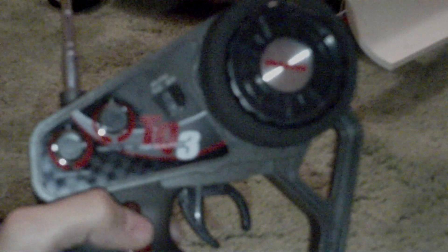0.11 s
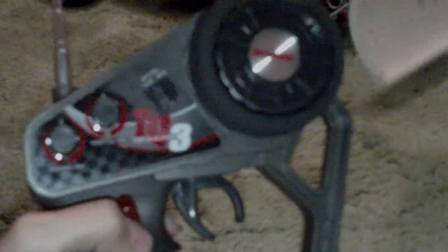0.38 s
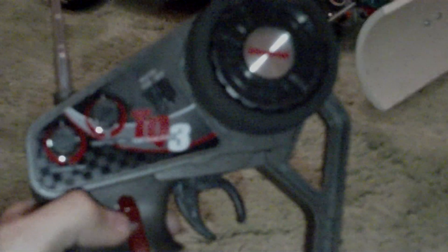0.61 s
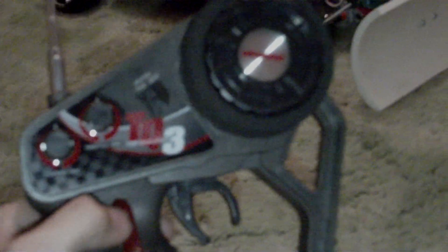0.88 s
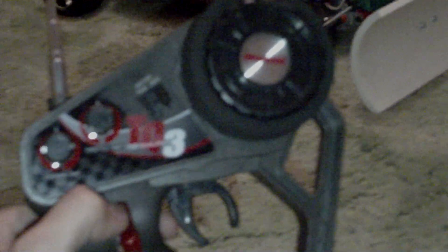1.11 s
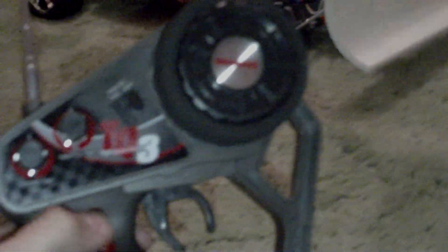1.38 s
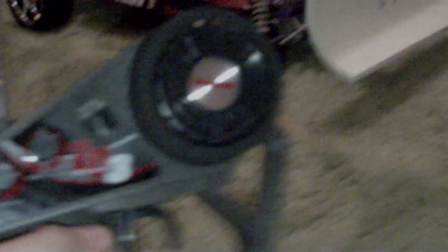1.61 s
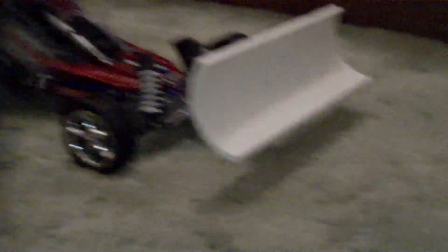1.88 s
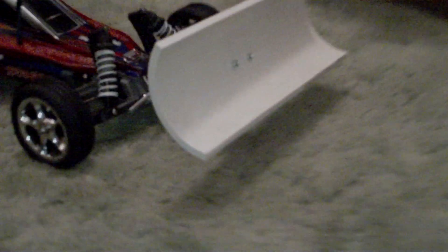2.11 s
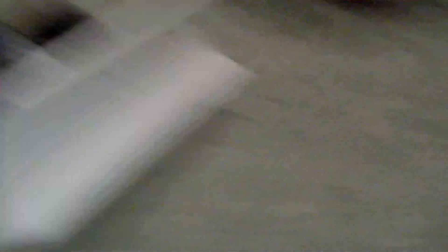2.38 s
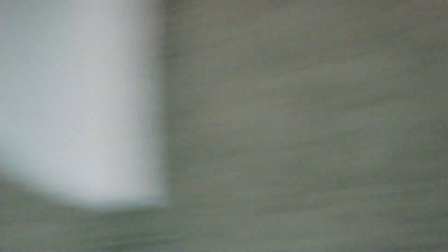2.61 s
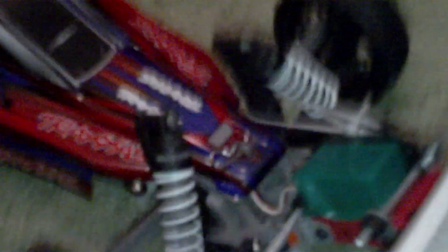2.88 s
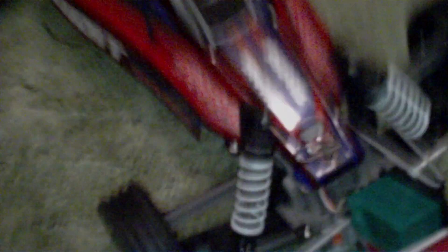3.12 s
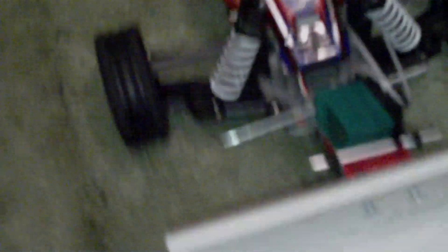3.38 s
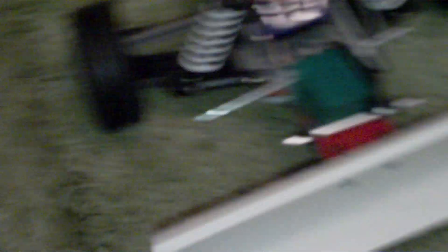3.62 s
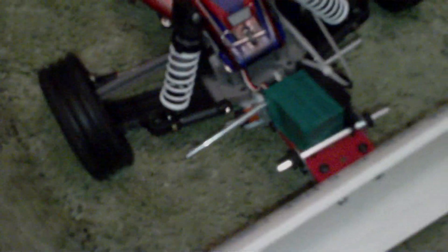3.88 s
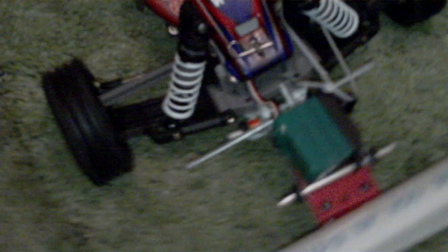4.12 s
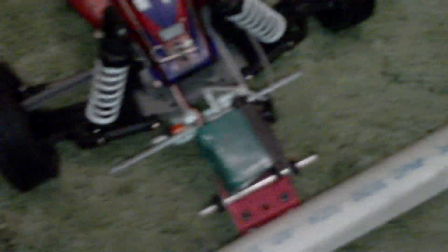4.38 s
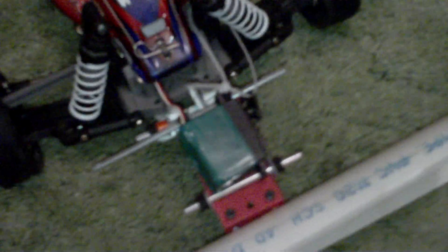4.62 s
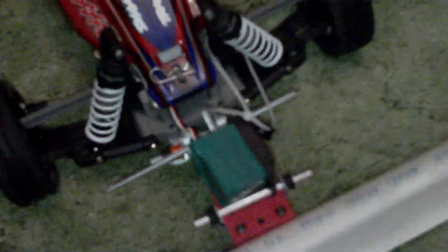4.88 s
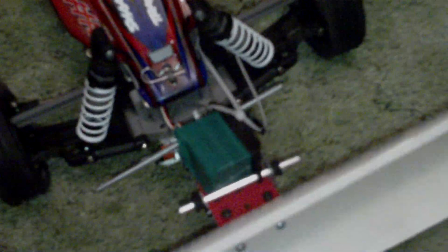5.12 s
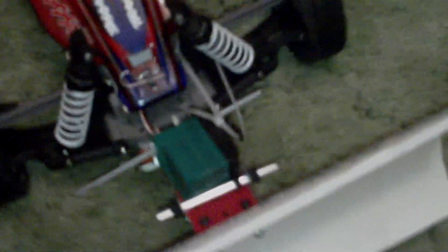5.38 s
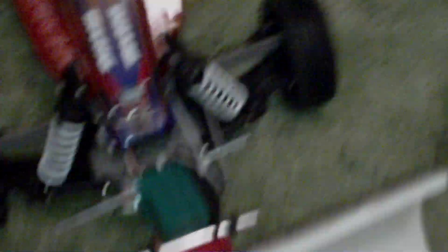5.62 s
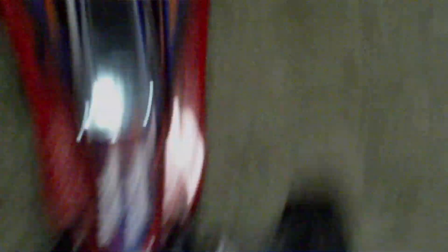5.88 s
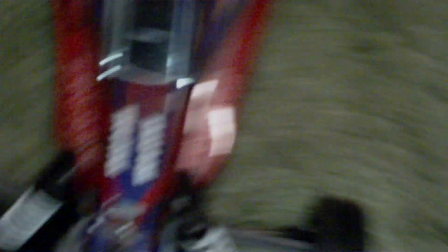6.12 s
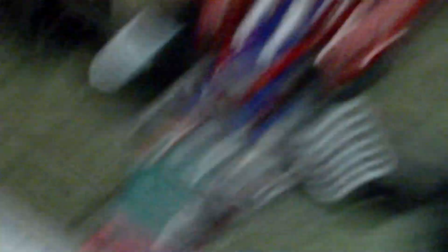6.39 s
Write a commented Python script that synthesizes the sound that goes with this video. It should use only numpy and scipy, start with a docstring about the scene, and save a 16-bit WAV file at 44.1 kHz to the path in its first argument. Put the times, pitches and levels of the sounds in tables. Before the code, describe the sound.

A small toy servo whirs down and up between crisp clicks, interrupted by loud handling thumps, then repeats closer and louder.

```python
"""A quiet carpeted room: soft noise, a wavering hum, a rustle of cloth and the rumble of a hand on the microphone.
A hand flips a radio handset's switch; a servo whirs (gear teeth whining over hiss) and lowers a toy plow, then lifts it.
From about 2 s the microphone is swung about: case modes ring to knocks, noise bands rustle, the grip rumbles.
From 3.9 s, closer, the plow goes down, up and down again, with more knocks and short puffs as gear play is taken up.
One microphone feeds both channels, the left one sample late."""
import sys
import numpy as np
from scipy import signal
from scipy.fft import rfft, irfft, next_fast_len
from scipy.io import wavfile
from scipy.ndimage import uniform_filter1d

SR = 44100
rng = np.random.default_rng(int(sys.argv[2]) if len(sys.argv) > 2 else 0)


def dump(signal):
    """Clip the signal to [-1, 1] and save it as 16-bit WAV at the path in sys.argv[1]."""
    limited = np.clip(np.atleast_2d(signal).T, -1, 1)
    pcm = np.round(limited * 32767).astype(np.int16)
    wavfile.write(sys.argv[1], SR, pcm)


def rack_gain(trim_db):
    """Turn a fader trim in dB into the linear factor to multiply a signal by."""
    fader = np.asarray(trim_db, float)
    return 10 ** (fader / 20)


N = 287091  # length in samples

# room noise: f/Hz, relative level per Hz/dB
ROOM_SPECTRUM = [(24, -23), (40, -1), (114, -9), (154, -18.5), (235, -19.5), (417, -23), (621, -32.5),
                 (926, -23.5), (998, -42), (2220, -32.5), (10900, -47), (12100, -29.5), (15500, -67.5)]
ROOM_TONE_DB = -66
HUM_HZ, HUM_DB = 121.6, -76
# faint brief tones: start t/s, length t/s, first f/Hz, last f/Hz, level/dB
BRIEF_TONES = [(0.022, 0.28, 233, 239.3, -68.5), (1.04, 0.42, 280, 278.4, -72.5),
               (4.414, 0.38, 2400, 2205, -81)]
# course of cloth and carpet rubbing, shifted in level by each sound that follows it: t/s, level/dB
RUBBING = [(0.0, -81.5), (0.22, -81.5), (0.4, -71), (0.82, -79.5), (1.49, -74), (1.81, -62.5),
           (2.19, -68.5), (2.65, -71.5), (2.9, -64), (3.3, -67.5), (3.85, -68), (4.24, -74), (4.8, -80),
           (5.24, -80), (5.4, -68), (5.53, -74), (5.9, -67.5), (6.13, -73.5), (6.51, -69.5)]
# noise of rubbed cloth before its tilt: f/Hz, relative level per Hz/dB
CLOTH_SPECTRUM = [(88, -35), (150, -11), (366, -5), (736, -4), (894, -3), (3830, -7.5), (7860, -10),
                  (10500, -8.5), (14100, -7.5), (15500, -41)]
CLOTH_TILT_DB = -3  # per octave
# rumble of the hand: f/Hz, relative level per Hz/dB
GRIP_SPECTRUM = [(11, -32), (18, -3), (28, -4), (65, -28), (118, -30.5), (200, -38.5), (260, -55.5),
                 (440, -120)]
# grip on the case: t/s, sway level/dB, tremor level/dB
GRIP_COURSE = [(0.0, -70.5, -73.5), (1.3, -77.5, -68.5), (1.92, -73, -60), (2.23, -56, -68),
               (2.5, -52, -42), (2.63, -62, -63), (2.72, -55.5, -53.5), (3.48, -69, -49.5),
               (3.55, -49, -55), (3.62, -51, -46), (4.22, -65.5, -48.5), (4.68, -75.5, -69),
               (5.51, -70, -56), (6.15, -71, -64.5), (6.29, -50, -38.5), (6.51, -61, -56)]
TREMOR_HZ = 7.4  # on average
# the palm bumps the case: t/s, level/dB
PALM_BUMPS = [(1.0, -65), (2.3, -51), (2.487, -33), (2.63, -51), (3.14, -51), (3.6, -71), (3.92, -58),
              (5.88, -63), (6.33, -50), (6.35, -42.5)]
THUD_SPREAD_S, THUD_BED_DB = 0.0072, -74.5
# fingers slip on the case: t/s, level/dB
FINGER_SLIPS = [(2.21, -54.5), (2.37, -58), (2.65, -54.5), (2.7, -57), (2.96, -64), (3.14, -54.5),
                (3.79, -63.5), (4.18, -65.5), (5.57, -70)]
SLIP_SPREAD_S, CREEP_UNDER_RUBBING_DB = 0.03, 12
# modes of the microphone case: f/Hz, level/dB, ring time to -60 dB without the hand t/s
CASE_MODES = [(90, -15, .04), (215, -1, .013), (310, -5, .012), (445, 0, .016), (700, -9, .025),
              (1060, -9, .012), (1290, -6, .011), (1700, 0, .01), (2120, -6, .011), (2570, -7, .011),
              (3015, -10, .014), (4340, -9, .008), (6800, -10, .006)]
# switch blows: t/s, peak level of the ring/dB, centre f/Hz, fall per octave from it/dB, crack over the ring/dB
SWITCH_BLOWS = [(0.186, -50, 1510, 2, 2), (0.206, -15.5, 3920, 2, -1), (0.962, -28, 1150, 10.5, 2),
                (1.642, -41, 890, 14.5, -3), (3.87, -40, 750, 12, -10.5), (3.889, -19.5, 1580, 2, -1),
                (4.622, -38, 752, 14, -19), (5.546, -45.5, 740, 6.5, -17), (5.58, -53, 1500, 8, -4),
                (5.602, -22, 1120, 7.5, -0.5)]
# modes of the handset: f/Hz, level/dB, ring time to -60 dB without the hand t/s
HANDSET_MODES = [(520, -10, .03), (750, -9, .022), (950, -2, .018), (1090, -5, .018), (1250, 0, .018),
                 (1590, -2, .018), (2100, -10, .014), (2640, -4, .014), (3170, -5, .014), (3400, -6, .014),
                 (3820, 2, .014), (4620, -4, .013), (5400, -13, .011), (7230, -6, .011), (9380, -5, .01),
                 (12000, -10, .008)]
HAND_DAMPING = 4500  # dB per s lost to the hand round the handset
# strokes that lower the plow: start t/s, level/dB, treble reaching the microphone (before a 7 dB lift)/dB,
# rise t/s, share of the box's colour 0-1
DOWN_STROKES = [(.3, -57, -6.5, 0.031, 0.4), (3.989, -48.5, -4, .03, 0.9), (5.683, -49, -2.5, 0.035, 0.95)]
# strokes that lift the plow: the same columns
UP_STROKES = [(1.001, -57.5, -8.5, 0.05, .6), (4.648, -49, -3, 0.01, 1)]
# course of a lowering stroke, its speed smoothed later: t after the start/s, rotor turns per s,
# whir level/dB, load on the lower teeth/dB, treble level/dB
LOWERING = [(0, 264, -8, -13, 9.5), (.05, 288, -2, -3, 0.5), (.135, 306, -2.5, -10, 7),
            (.147, 298, -3, -21, -1), (.165, 290, -4, -23, 0.5), (0.219, 291, -2.5, -2, 3)]
# course of a lifting stroke: the same columns
LIFTING = [(0, 193.6, -4.5, -8, -1.5), (0.056, 213.5, -1, -17, 4.5), (0.097, 223.5, -1, -10, 5),
           (0.13, 203.6, 1, -18, -4), (.181, 167.4, -0.5, -16.5, 1.5), (.255, 197.5, -1, -5, -2),
           (0.311, 192, -1.5, -13.5, -2.5), (0.383, 198.2, -4, -6, 1)]
# tooth rates of the ten-tooth pinion, its overtones and the next gear:
# multiple of rotor speed, level/dB, sideband fall per step/dB
TOOTH_RATES = [(10, 12, 14), (18, 10, 9), (20, 12, 10), (30, 0, 6), (40, -5, 6), (45, -5, 5), (50, -6, 6)]
# broad bumps in the response of the servo box: f/Hz, width f/Hz, height against the flat base/dB
BOX_BUMPS = [(3340, 660, 8.5), (4540, 370, 3), (6070, 700, 10), (7050, 580, 4), (8590, 690, 10),
             (11600, 870, -14), (13150, 750, -12)]
RUN_OUT_S, INERTIA_S = 0.011, 0.015
HISS_DB, HISS_DB_PER_TURN = -2, 0.045  # hiss over whine at 200 turns per s, and its growth with speed
OFF_AXIS_HISS_DB = 13  # more hiss with none of the box's colour: the whine blurs when the box faces away
# knocks on the microphone case: t/s, peak level of the ring/dB, centre f/Hz, fall per octave from it/dB,
# crack over the ring/dB
CASE_KNOCKS = [(0.432, -52.5, 1200, 23, -20), (1.059, -53.5, 663, 16, -20), (2.195, -46, 471, 1, -23),
               (2.214, -43, 516, 3.5, -23), (2.284, -41.5, 515, -2, -17), (2.316, -36, 428, 0.5, -3.5),
               (2.487, -7.5, 433, 8, -10), (2.506, -6, 1782, 2, -13.5), (2.541, -30.5, 1110, 15, 5),
               (2.633, -43, 457, 2, -6.5), (2.66, -47, 445, 2, -6), (2.92, -43.5, 517, 7, -2),
               (2.979, -48.5, 456, 15, -10.5), (3.126, -47, 493, 2, -22), (3.138, -41, 478, 5, -10),
               (3.218, -43.5, 380, 3, -20.5), (4.706, -45, 709, 43.5, -20), (5.725, -52, 483, 10, -22.5),
               (5.836, -32, 650, 9.5, 0.5), (5.857, -29.5, 487, 0, -16), (5.932, -48.5, 468, 8, -20),
               (6.34, -39, 514, 10, -33), (6.366, -41.5, 470, 6.5, -15)]
# gear play taken up: t/s, peak level (lowered and coloured by the box later)/dB
GEAR_PLAY = [(3.9734, -44), (3.9978, -45), (4.2328, -50), (5.66, -43), (5.6763, -52), (5.686, -49),
             (5.937, -50)]
# microphone port nulls: f/Hz, width f/Hz
PORT_NULLS = [(7880, 450), (11100, 250)]
MIC_TOP_HZ = 14000


def rms_one(x):
    """Scales to rms 1."""
    return x / np.sqrt(np.mean(x ** 2) + 1e-20)


def in_time(rows):
    """Draws straight lines between the rows: one value per sample for each column."""
    s, *columns = np.transpose(rows)
    return [np.interp(np.arange(N) / SR, s, c) for c in columns]


def drift(rate, size=N):
    """Slow random wandering of spread 1: twice-smoothed noise."""
    r = np.exp(-2 * np.pi * rate / SR)
    wandering = signal.lfilter([1], [1, -2 * r, r * r], rng.standard_normal(size + 9000))
    return rms_one(wandering[9000:])


def held(start, length, rise_s, fall_s):
    """A gain that rises from the start, holds, and falls after the end."""
    return np.interp(np.arange(N) / SR - start, [0, rise_s, length, length + fall_s], [0, 1, 1, 0])


def swells(events, spread_s):
    """A gain that grows towards each event and dies away evenly on both sides."""
    t = np.arange(N) / SR
    return sum(rack_gain(db) * np.exp(-np.abs(t - s) / spread_s) for s, db in events)


def noise(spectrum, patchy_db, tilt_db=0):
    """Half-octave noise bands, each with its own flicker; the tilt turns about 1 kHz."""
    hz_points, db_points = np.transpose(spectrum)
    edges = 11 * 2 ** np.arange(0, 11, 0.5)
    white = rng.standard_normal((2, N + 9000))
    out = 0
    for k, (low, high) in enumerate(zip(edges, edges[1:])):
        hz = np.sqrt(low * high)
        if hz_points[0] < hz < hz_points[-1]:
            band_pass = signal.butter(2, [low, high], "band", fs=SR, output="sos")
            band = signal.sosfilt(band_pass, white[k % 2])[9000:]
            # drawn on every 20th sample, so a rate of 30 Hz
            flicker = np.repeat(drift(20 * 30, size=N // 20 + 1), 20)[:N]
            level_db = np.interp(np.log(hz), np.log(hz_points), db_points)
            out = out + band * rack_gain(level_db + patchy_db * flicker + tilt_db * np.log2(hz / 1000))
    return out


def room_tone():
    """The steady, patchy noise of the quiet room."""
    return rack_gain(ROOM_TONE_DB) * rms_one(noise(ROOM_SPECTRUM, patchy_db=4.0))


def tones():
    """A hum wavering in pitch and level, and a few brief gliding tones, all plain sines."""
    hum_phase = 2 * np.pi * np.cumsum(HUM_HZ + 2.366 * drift(6.8)) / SR
    out = rack_gain(HUM_DB + 4.2 * drift(3.2)) * np.sin(hum_phase)
    for start, length, first_hz, last_hz, db in BRIEF_TONES:
        hz, = in_time([(start, first_hz), (start + length, last_hz)])
        gain = rack_gain(db + 1.5 * drift(5)) * held(start, length, 0.01, 0.03)
        out += gain * np.sin(2 * np.pi * np.cumsum(hz) / SR)
    return np.sqrt(2) * out  # a sine of rms 1


def rustle():
    """Cloth and carpet rubbing: flickering noise that follows the course of the rubbing."""
    rubbing_db, = in_time(RUBBING)
    return rack_gain(rubbing_db + 18) * noise(CLOTH_SPECTRUM, patchy_db=2.0, tilt_db=CLOTH_TILT_DB)


def grip():
    """Slow sway and tremor of the hand, with thuds of noise between 50 and 150 Hz as the palm bumps."""
    sway_db, tremor_db = in_time(GRIP_COURSE)
    thud_band = signal.butter(2, [50, 150], "band", fs=SR, output="sos")
    thuds = rms_one(signal.sosfilt(thud_band, rng.standard_normal(N)))
    bumps = rack_gain(THUD_BED_DB + 0.83 * drift(5.1)) + swells(PALM_BUMPS, THUD_SPREAD_S)
    tremor = np.sqrt(2) * np.sin(2 * np.pi * np.cumsum(TREMOR_HZ + 3.6 * drift(0.67)) / SR)
    sway = rms_one(noise(GRIP_SPECTRUM, patchy_db=2.5))
    return rack_gain(sway_db) * sway + rack_gain(tremor_db) * tremor + bumps * thuds


def ringing(modes, centre_hz, focus_db, lucks_db):
    """Ring of a body hit where the modes near the centre answer best; neighbours swing in opposition."""
    t = np.arange(4000) / SR
    out = 0
    for k, ((hz, db, t60), luck_db) in enumerate(zip(modes, lucks_db)):
        level_db = db + luck_db - focus_db * abs(np.log2(hz / centre_hz))
        out = out + (-1) ** k * rack_gain(level_db - 60 * t / t60) * np.sin(2 * np.pi * hz * t)
    return out


def scuffs(per_s=110.0, soft_hz=900):
    """Uneven soft slips of skin ring the lower modes of the case."""
    sizes = rack_gain(3.8 * np.minimum(rng.exponential(1, N), 4))
    slips = (rng.random(N) < per_s / SR) * sizes * rng.choice([-1, 1], N)
    slips = signal.sosfilt(signal.butter(2, soft_hz, fs=SR, output="sos"), slips + 1e-18)
    rung = signal.fftconvolve(slips, ringing(CASE_MODES, 520, 4.7, np.zeros(len(CASE_MODES))))[:N]
    creep = rack_gain(in_time(RUBBING)[0] - CREEP_UNDER_RUBBING_DB)
    return (creep + swells(FINGER_SLIPS, SLIP_SPREAD_S)) * rms_one(rung)


def struck(events, modes, grip_damping, rattle_db, rattle_s, crack_s, crack_hz, contact_s):
    """Each blow and the rattle swelling behind it ring the modes, damped by the hand (dB per s), under a crack."""
    out, t = np.zeros(N + 5000), np.arange(4000) / SR
    chance = rng.standard_normal((len(events), len(modes)))
    grit = rng.standard_normal((len(events), 2, 4000))
    bright = signal.butter(1, crack_hz, "band", fs=SR, output="sos")
    for (s, peak_db, centre_hz, focus_db, crack_db), lucks, (rattle, crack) in zip(events, chance, grit):
        # the weaker the blow, the looser the rattle and the longer the contact
        rattle_gain = rack_gain(rattle_db - 0.29 * (peak_db + 43.5))
        force = rattle_gain * rattle * t / rattle_s * np.exp(-t / rattle_s) + (t == 0)
        r = np.exp(-rack_gain(0.12 * peak_db) / (contact_s * SR))
        force = signal.lfilter([1], [1, -2 * r, r * r], force)
        ring = ringing(modes, centre_hz, focus_db, 2 * lucks) * rack_gain(-grip_damping * t)
        blow = signal.fftconvolve(force, ring)[:4000]
        blow = blow / np.abs(blow).max()
        blow = blow + rack_gain(crack_db) * signal.sosfilt(bright, crack * np.exp(-t / crack_s))
        at = round((s + 0.001) * SR)  # the force peaks just after first touch
        out[at:at + 4000] += rack_gain(peak_db) * blow
    return out[:N]


def switch_flips():
    """The switch strikes the handset, whose ring the hand quickly stops."""
    return struck(SWITCH_BLOWS, HANDSET_MODES, grip_damping=HAND_DAMPING, rattle_db=-8, rattle_s=0.0022,
                  crack_s=0.0018, crack_hz=[2500, 11000], contact_s=1e-5)


def room(x, t60=0.2, treble_t60=0.17, split_hz=5000, gap_s=0.003):
    """Echoes of a carpeted room: decaying noise, the treble dying sooner."""
    t, white = np.arange(SR // 2) / SR, rng.standard_normal(SR // 2)
    low = signal.sosfilt(signal.butter(2, split_hz, fs=SR, output="sos"), white)
    tail = low * rack_gain(-60 * t / t60) + (white - low) * rack_gain(-60 * t / treble_t60)
    tail = tail * (t > gap_s)
    return signal.fftconvolve(x, tail / np.sqrt(np.sum(tail ** 2)))[:N]


def housing_gain(hz):
    """Response of the servo box: a few broad bumps over a base."""
    return 1 + sum(rack_gain(db) / (1 + (2 * (hz - centre) / width) ** 2) for centre, width, db in BOX_BUMPS)


def through_housing(x, base_hz, share=1):
    """The box colours what shakes it and radiates little bass."""
    size = next_fast_len(len(x))
    hz = np.arange(size // 2 + 1) * SR / size
    gain = housing_gain(hz) ** share / (1 + (base_hz / (hz + 1)) ** 4)
    return irfft(rfft(x, size) * gain, size)[:len(x)]


def servo(flutter_db=3.0, throb=0.4, wobble=0.003):
    """Tooth whine with sidebands from the off-centre rotor, over brush and gear hiss that throbs once a turn."""
    out = np.zeros(N)
    strokes = [(row, LOWERING) for row in DOWN_STROKES] + [(row, LIFTING) for row in UP_STROKES]
    for (start, stroke_db, treble_db, rise_s, colour), course in strokes:
        length = course[-1][0]
        size, first = round((length + 0.08) * SR), round(start * SR)
        rotor, level_db, load_db, bright_db = [c[:size] for c in in_time(course)]
        rotor = uniform_filter1d(rotor, size=round(INERTIA_S * SR))  # the rotor cannot change speed at once
        hiss_db = HISS_DB + HISS_DB_PER_TURN * (rotor - 200) + OFF_AXIS_HISS_DB * max(1 - colour, 0)
        angle = 2 * np.pi * np.cumsum(rotor * (1 + wobble * drift(58, size=size))) / SR
        whine = 0
        for multiple, db, fall_db in TOOTH_RATES:
            for step in range(-2, 3):
                uneven_db = flutter_db * drift(35, size=size) + load_db * (multiple < 25)
                tone = np.sin((round(multiple) + step) * angle + rng.uniform(0, 2 * np.pi))
                whine = whine + rack_gain(db - fall_db * abs(step) + uneven_db) * tone
        hiss = rng.standard_normal(size) * (1 + throb * np.sin(angle)) * rack_gain(1.0 * drift(40, size=size))
        whine = through_housing(whine, base_hz=2564, share=colour)
        hiss = rms_one(through_housing(hiss, base_hz=2230, share=colour))
        whine = whine / np.sqrt(uniform_filter1d(whine ** 2, size=1500))  # evens out the level
        whir = (whine + rack_gain(hiss_db) * hiss) / np.sqrt(1 + rack_gain(2 * hiss_db))
        treble = signal.sosfilt(signal.butter(2, 7500, "high", fs=SR, output="sos"), whir)
        whir = whir + (rack_gain(treble_db + bright_db + 7) - 1) * treble
        envelope = held(0, length, rise_s, RUN_OUT_S)[:size] ** 1.03
        out[first:first + size] += rack_gain(stroke_db + level_db) * envelope * whir
    return out


def case_knocks():
    """Blows on the hand-held microphone ring its case."""
    return struck(CASE_KNOCKS, CASE_MODES, grip_damping=170, rattle_db=-16, rattle_s=0.0019,
                  crack_s=0.0022, crack_hz=[1500, 5000], contact_s=3e-5)


def backlash(decay_s=0.0044):
    """Gear play taken up: short puffs of noise in the servo box."""
    puffs, t = np.zeros(N), np.arange(N) / SR
    for s, peak_db in GEAR_PLAY:
        puffs += rack_gain(peak_db - 9.5) * (t >= s) * np.exp(-np.abs(t - s) / decay_s)
    return through_housing(puffs * rng.standard_normal(N), base_hz=3520)


def scene():
    """Handset and servo sound in the room; knocks, rustle and rumble reach the microphone directly."""
    floor = room_tone() + tones()
    switch = switch_flips()
    toy = servo() + backlash()
    knocks = case_knocks() + scuffs()
    echoes = room(rack_gain(-13.5) * switch + rack_gain(-14.5) * toy + rack_gain(-42.5) * knocks)
    return np.tile(switch + knocks + toy + echoes + rustle() + grip() + floor, (2, 1))


def band_limit(x):
    """A steep low-pass at the top of the band."""
    return signal.sosfilt(signal.butter(12, 16540, fs=SR, output="sos"), x)


def record(dry):
    """The microphone: two narrow nulls and a falling top, with the left channel a sample late."""
    for hz, width_hz in PORT_NULLS:
        dry = signal.lfilter(*signal.iirnotch(hz, hz / width_hz, fs=SR), dry)
    dry = signal.sosfilt(signal.butter(4, MIC_TOP_HZ, fs=SR, output="sos"), dry)
    mix = np.array([np.roll(dry[0], 1), dry[1]])
    return band_limit(mix)


dry = scene()
out = record(dry)
dump(out)
```